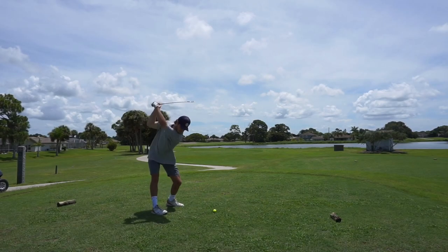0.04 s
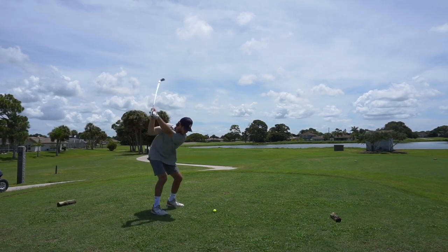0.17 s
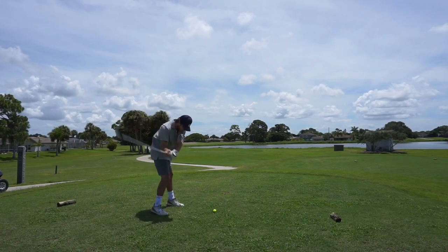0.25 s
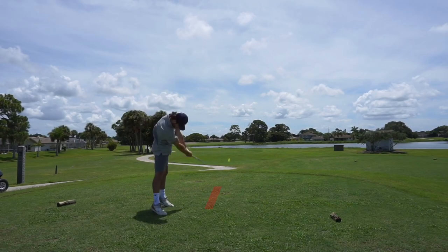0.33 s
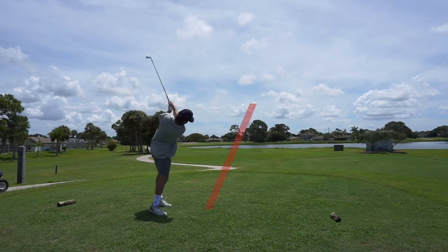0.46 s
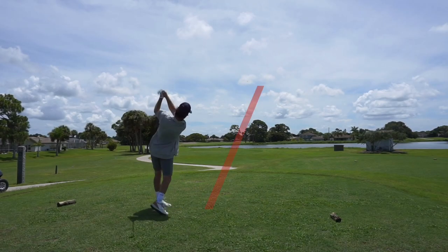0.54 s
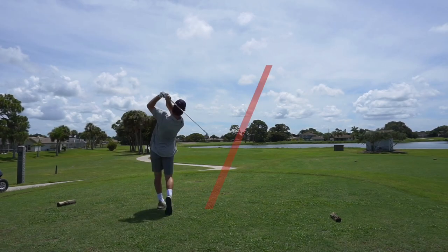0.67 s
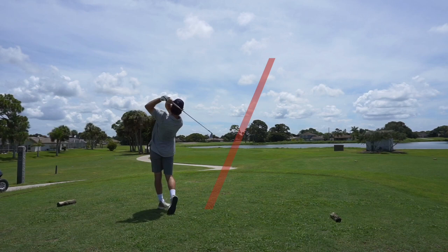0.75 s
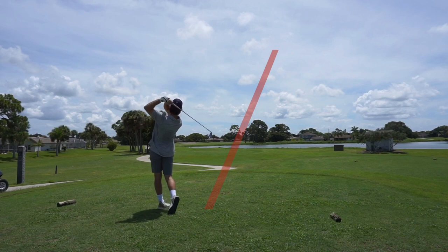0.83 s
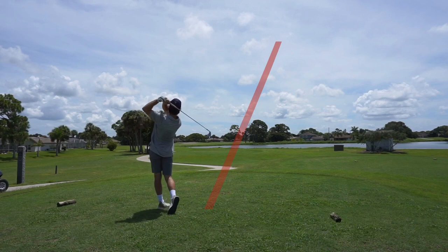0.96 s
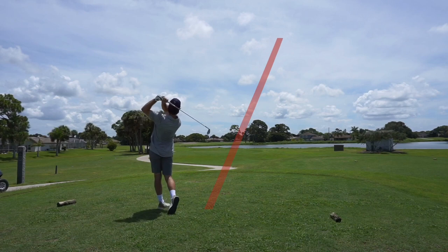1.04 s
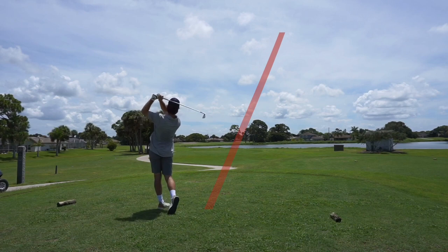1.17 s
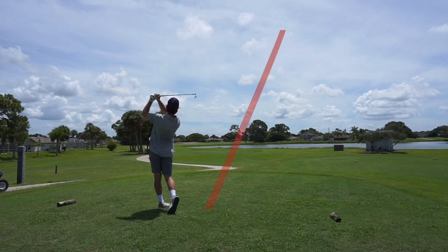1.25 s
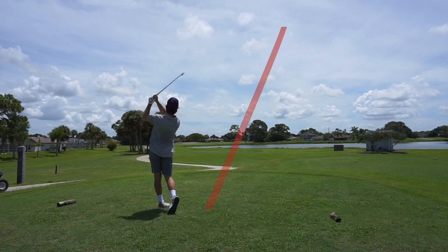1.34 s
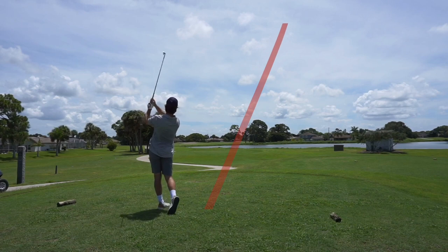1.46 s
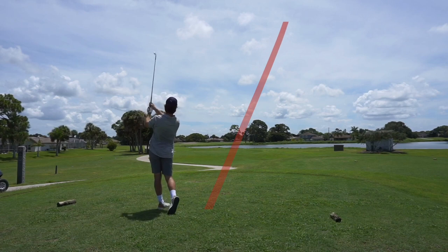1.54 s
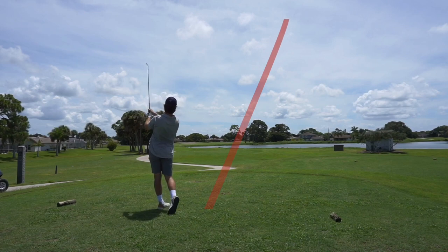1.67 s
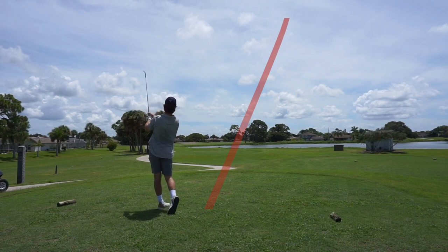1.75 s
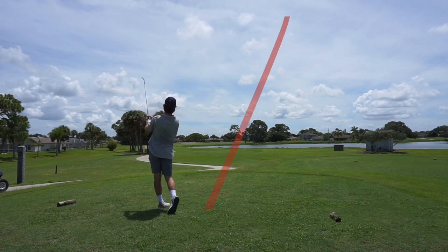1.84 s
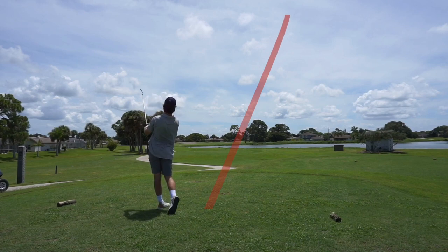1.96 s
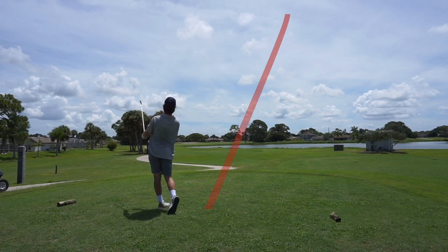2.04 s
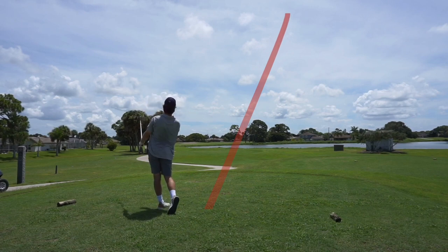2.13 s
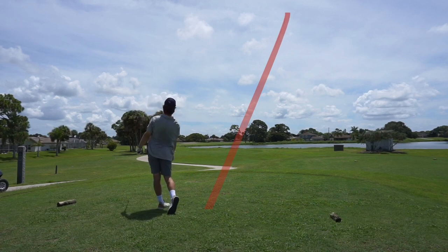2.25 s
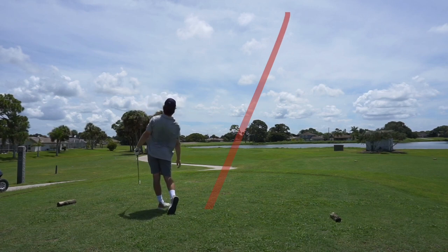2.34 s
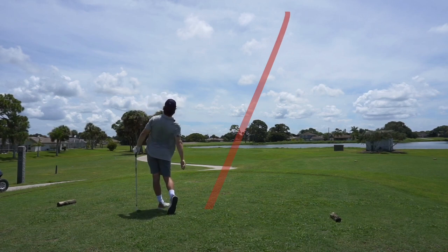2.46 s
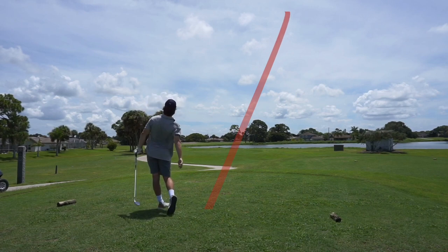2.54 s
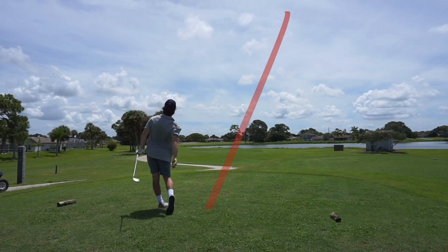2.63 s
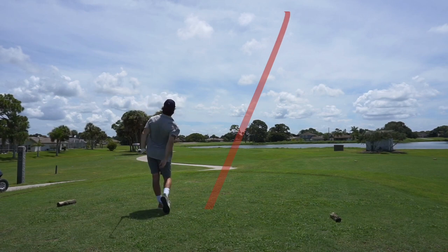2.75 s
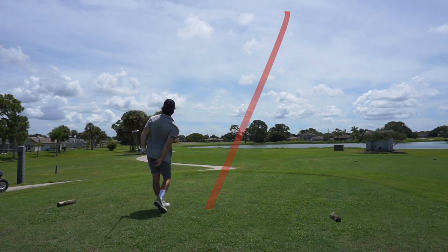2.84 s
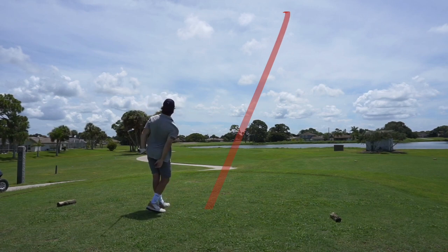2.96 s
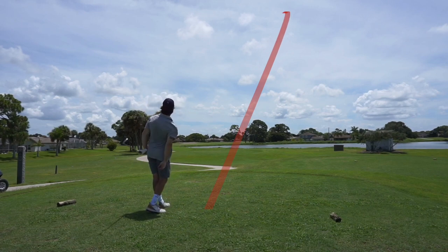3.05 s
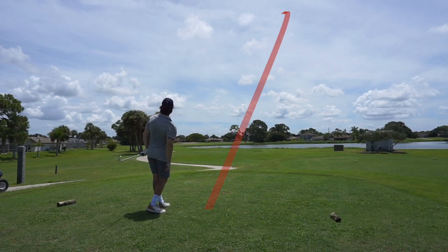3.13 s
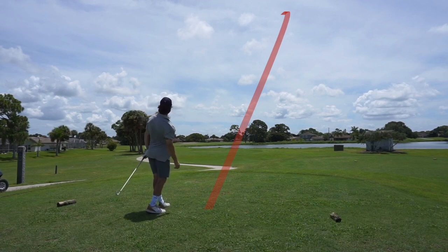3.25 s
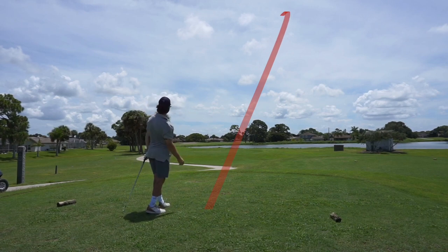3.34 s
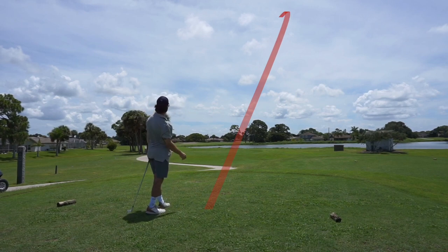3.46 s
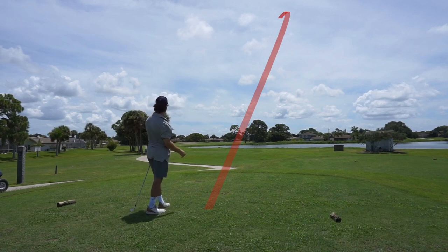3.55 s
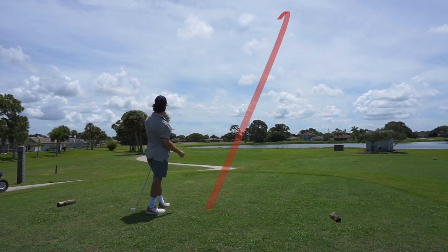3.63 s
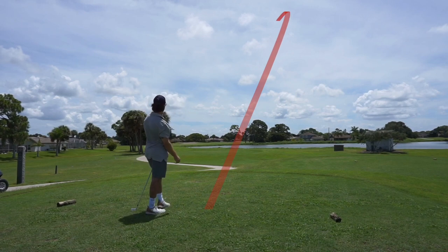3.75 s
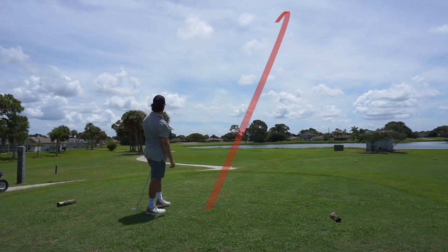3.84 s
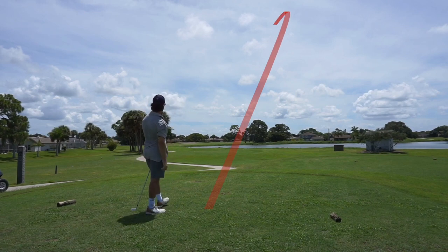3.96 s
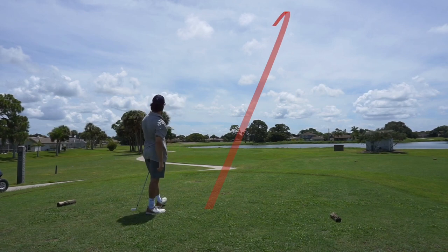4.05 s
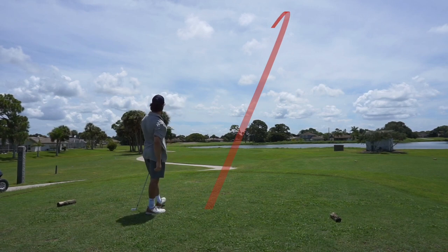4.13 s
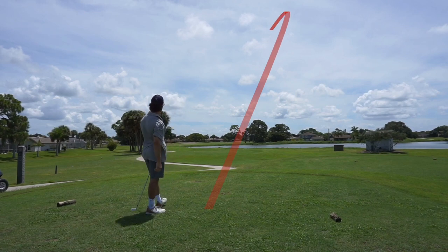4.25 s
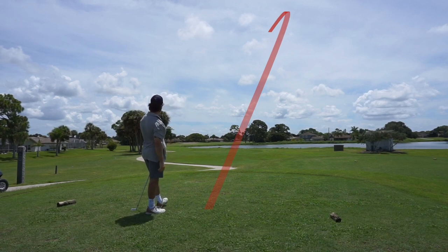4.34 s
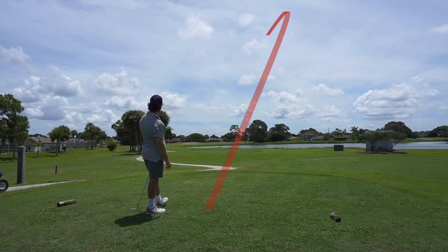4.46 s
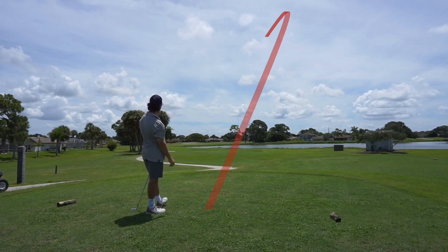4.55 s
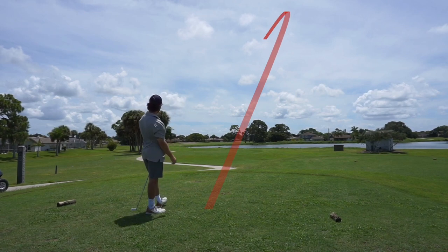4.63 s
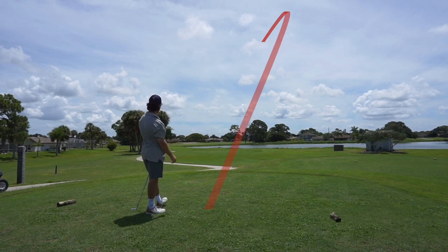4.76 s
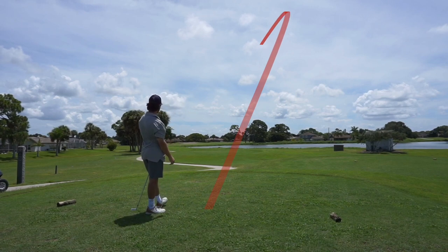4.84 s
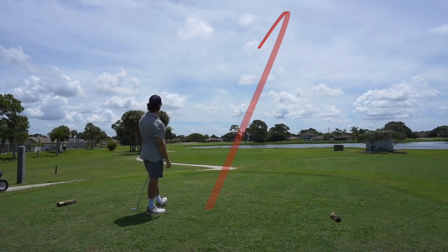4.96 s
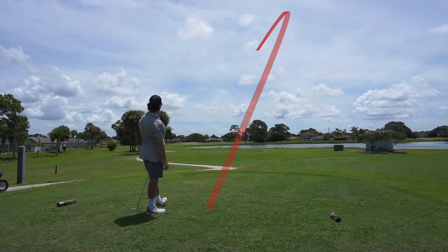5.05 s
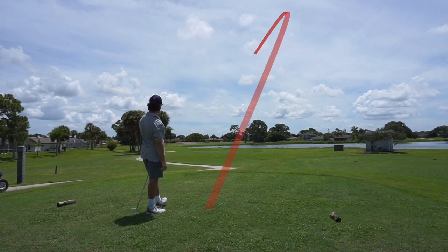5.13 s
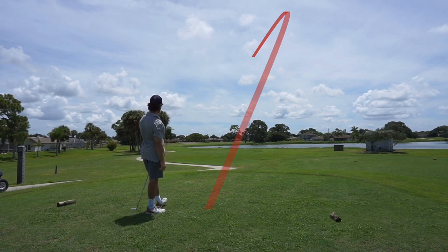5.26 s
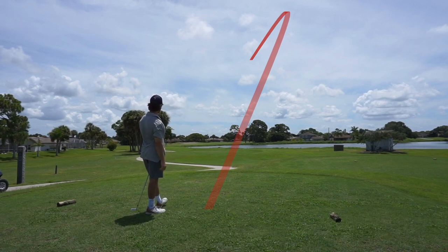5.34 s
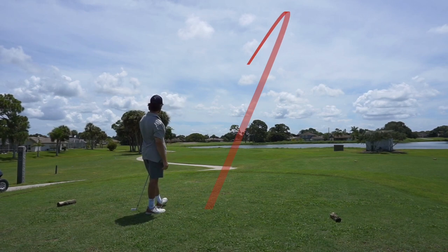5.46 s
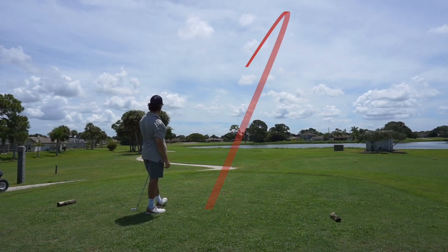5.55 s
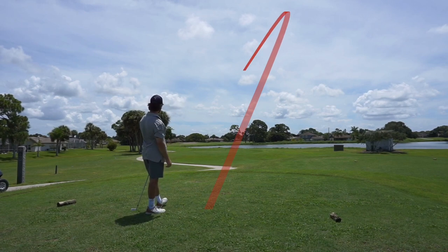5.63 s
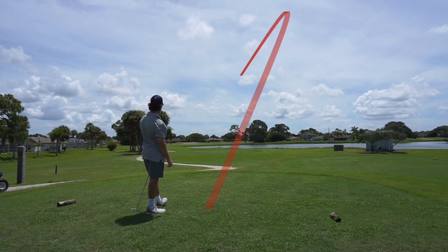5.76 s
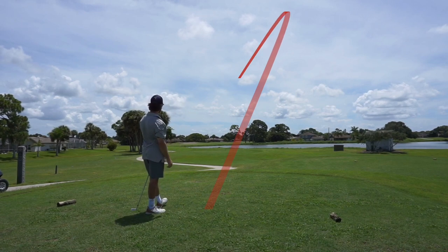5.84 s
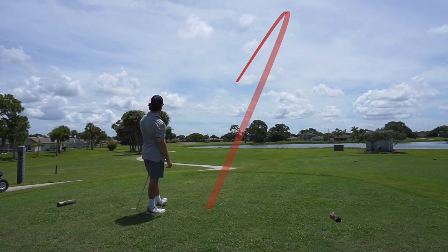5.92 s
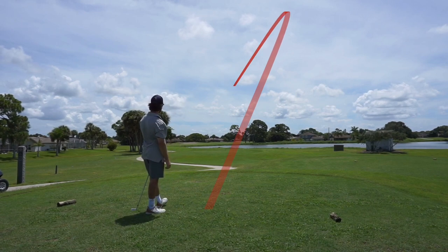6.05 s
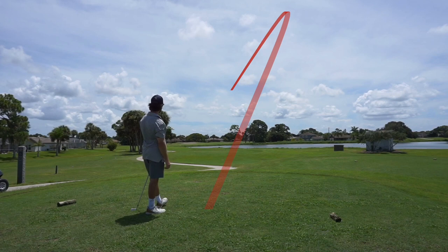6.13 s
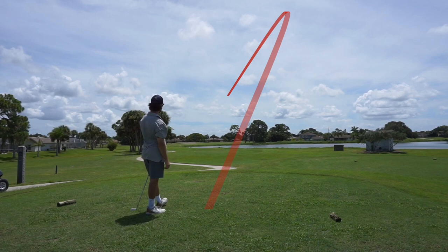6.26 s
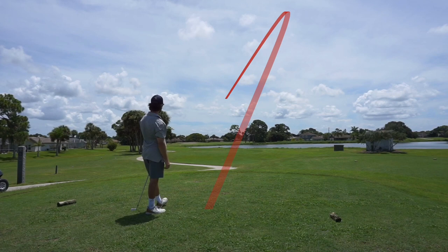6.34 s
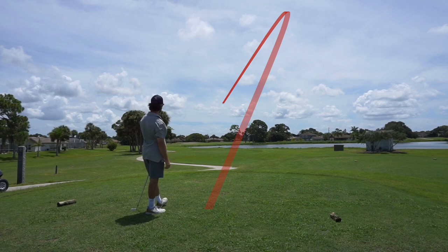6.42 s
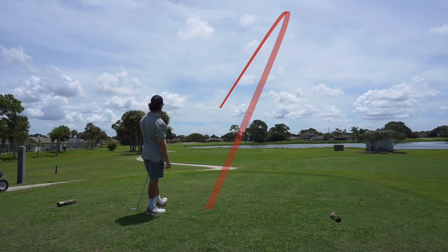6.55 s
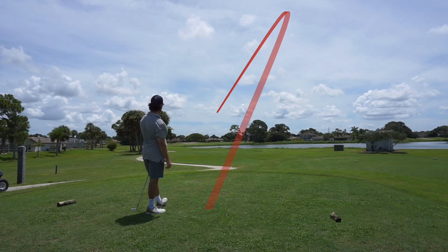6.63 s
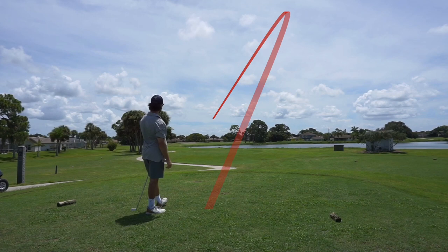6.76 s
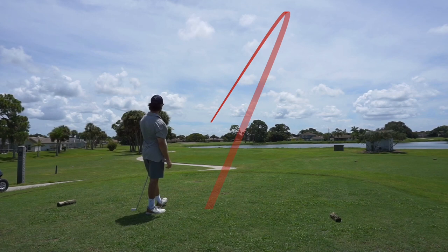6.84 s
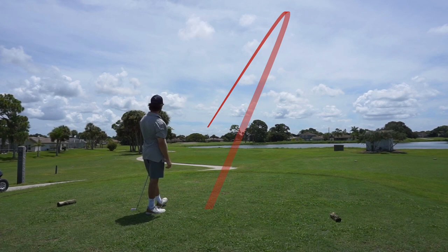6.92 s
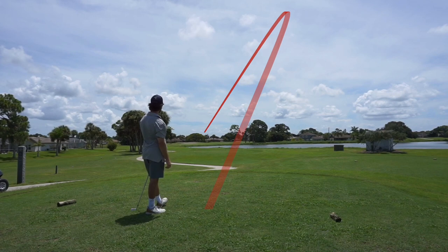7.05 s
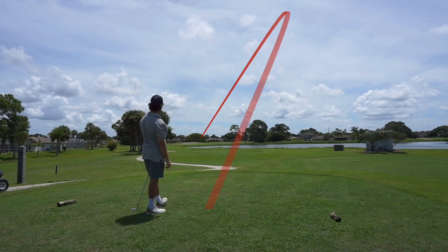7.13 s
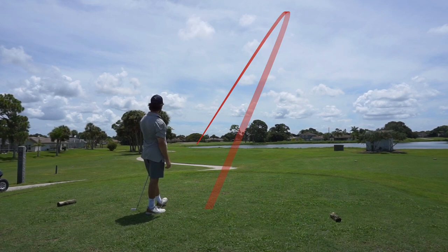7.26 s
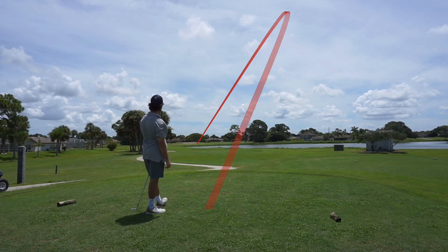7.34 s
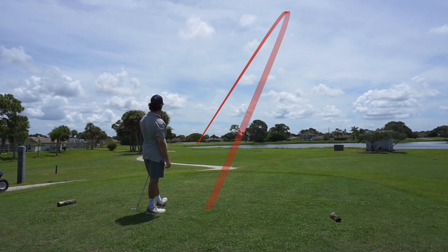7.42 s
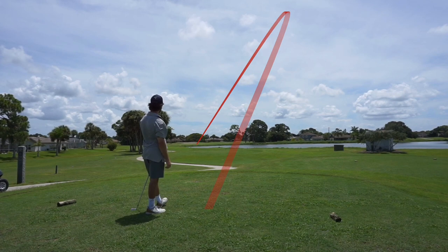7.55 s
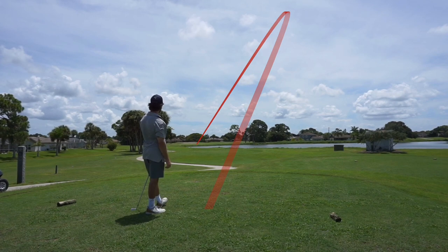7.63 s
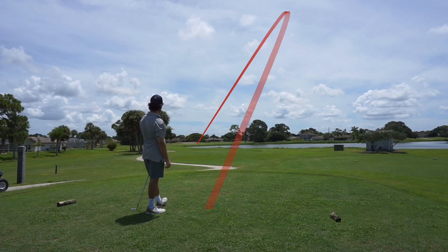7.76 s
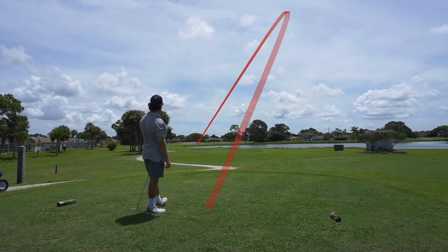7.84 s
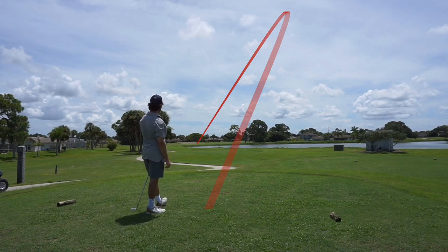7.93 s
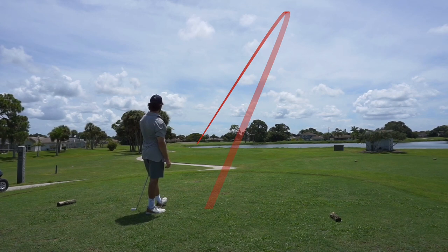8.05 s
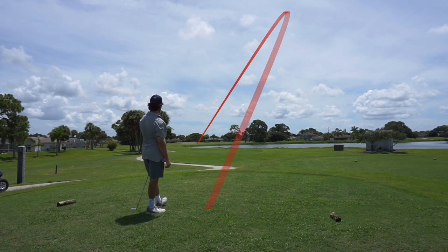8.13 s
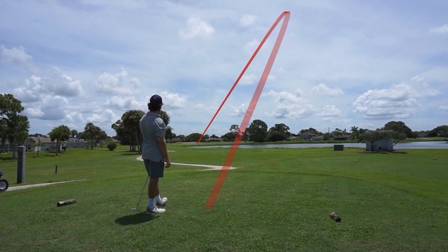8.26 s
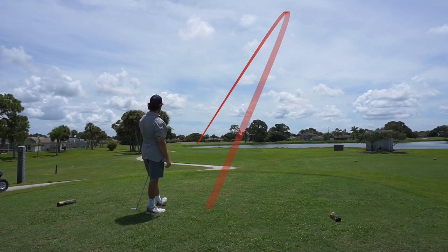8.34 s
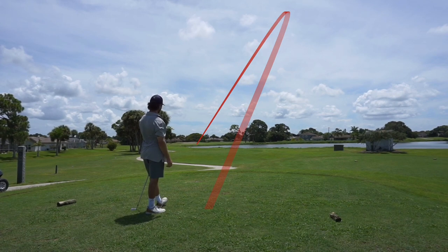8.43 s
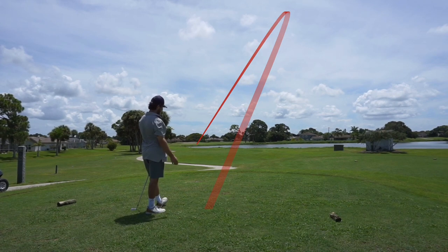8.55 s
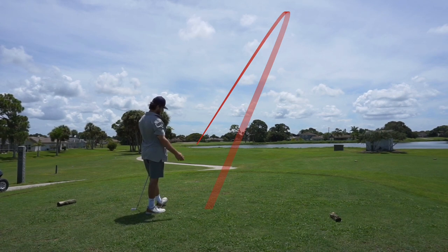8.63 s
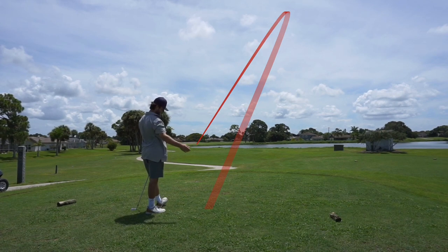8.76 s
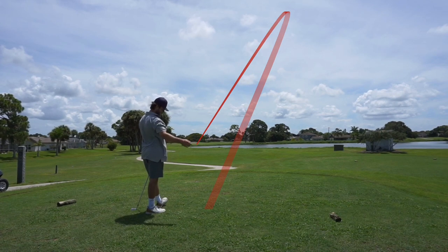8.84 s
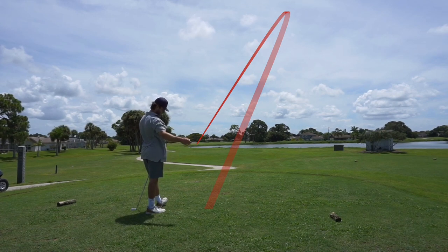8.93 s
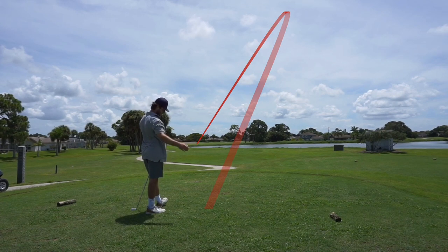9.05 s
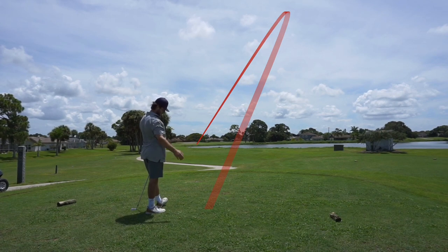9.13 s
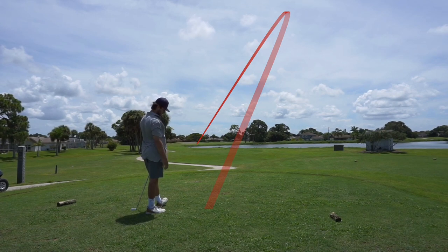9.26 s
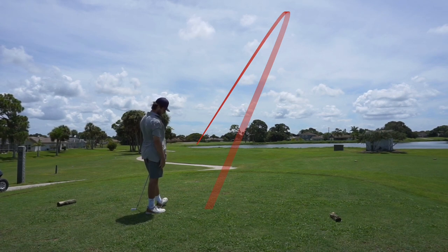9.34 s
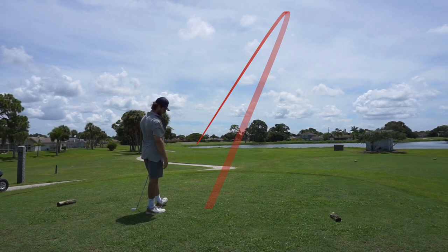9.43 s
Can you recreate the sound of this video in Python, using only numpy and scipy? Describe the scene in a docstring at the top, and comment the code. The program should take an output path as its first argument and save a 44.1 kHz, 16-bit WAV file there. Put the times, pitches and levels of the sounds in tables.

```python
"""A golf iron swishes down and cracks a ball off the tee, a few metres away on an open course.
Vortex shedding makes the swish; the impact sends out a pressure pulse and sets the club head ringing.
A faint echo and a few soft knocks follow. Wind eddies buffet the microphone, katydids buzz by
stridulation, an insect ticks, and far birds, traffic and a mower lie behind.
A limiter ducks for a moment after the strike."""
import sys
import numpy as np
from scipy import signal
from scipy.fft import rfft, irfft
from scipy.io import wavfile
from scipy.ndimage import uniform_filter1d, minimum_filter1d

SR = 44100
rng = np.random.default_rng(int(sys.argv[2]) if len(sys.argv) > 2 else 0)


def master_out(mix):
    """Clip the mix to full scale and print it as 16-bit PCM to the path in sys.argv[1]."""
    frames = np.transpose(np.atleast_2d(mix))
    ceiling = np.clip(frames, -1, 1)
    pcm = np.round(ceiling * 32767).astype(np.int16)
    wavfile.write(sys.argv[1], SR, pcm)


N = 418509
T = np.arange(N) / SR

# Spectra of the noise sources. Each row: frequency in Hz, relative spectral density in dB.
TRAFFIC_SPECTRUM = [(100, 12), (300, 3), (480, -2), (700, 1), (950, 1.5), (1300, -3), (1700, -9),
                    (2300, -10), (3100, -8.5), (4000, -14), (6000, -16.5), (12000, -20), (16000, -28)]
CHORUS_SPECTRUM = [(5500, -49), (7200, -17), (8000, -11), (8850, 4.5), (9450, -9), (10100, -8.5),
                   (10800, -8.5), (12400, -20.5), (16000, -30)]
WING_SPECTRUM = [(4500, -49), (6500, -17.5), (7400, -5.5), (8100, 5), (8900, 0), (9500, 0.5), (10200, -3),
                 (11500, -10.5), (13000, -15.5), (16000, -39)]
SHRILL_SPECTRUM = [(7000, -26.5), (9200, -9), (10100, 4.5), (10750, -6.5), (11200, 0.5), (11700, -3.5),
                   (12300, -11), (13500, -22), (16000, -21)]
RUMBLE_SPECTRUM = [(12, -16), (25, 1.5), (45, 4.5), (62, 0), (85, -2.5), (115, -17), (160, -18.5),
                   (300, -66), (3000, -120)]
FLUTTER_SPECTRUM = [(70, -3), (130, 4), (165, -6.5), (220, -10), (320, -19), (500, -25.5), (1000, -40.5),
                    (2000, -45.5), (10000, -110)]
GRIT_SPECTRUM = [(800, -6), (2000, 3), (3100, 3), (3900, -3), (5000, 3.5), (5800, -16), (6800, -4.5),
                 (9000, -7), (12000, -24), (16000, -22)]  # club face, tee and turf
# Slow level contours. Each row: time in seconds, relative level in dB.
TRAFFIC_LEVELS = [(0.4, -46.5), (1.96, -49.5), (4.08, -48.5), (6.86, -52.5), (7.79, -52.5), (9.15, -52)]
CHORUS_LEVELS = [(0.0, -50.5), (0.65, -44.5), (0.8, -49.5), (1.15, -46.0), (1.7, -49.5), (1.85, -45),
                 (2.0, -46.0), (2.15, -50), (2.55, -45), (3.25, -50), (3.5, -47.0), (4.05, -52.5),
                 (4.2, -47), (4.4, -48.5), (7.34, -46.0), (7.64, -48.5), (8.89, -44.5), (9.49, -48.5)]
WIND_LEVELS = [(0.0, -19.5), (0.3, -28), (2.1, -19.5), (2.3, -26), (3.15, -26), (3.3, -33.5), (3.5, -23),
               (3.7, -29), (3.95, -23), (4.94, -27.5), (6.59, -24.5), (6.69, -18.5), (7.69, -19.5),
               (7.79, -21), (8.39, -17.5), (8.54, -20.5), (9.29, -24.5), (9.49, -26.5)]
# The mower's whine. Each row: time in seconds, pitch in Hz, level in dB.
MOWER_WHINE = [(0, 890, -68), (.9, 876, -57), (1.7, 859, -57.5), (2.3, 800, -67), (2.8, 790, -55),
               (3.4, 798, -56), (3.7, 902, -57), (4.8, 904, -66), (5.8, 933, -58.5), (6.6, 898, -66),
               (7.6, 822, -60), (9.49, 810, -69)]
# The mower's hum. Each row: frequency in Hz, level in dB.
MOWER_HUM = [(237, -58), (307, -57)]
# Far bird notes. Each row: time of the peak in seconds, level in dB, pitch in Hz.
BIRD_CHIPS = [(3.975, -54, 3020), (4.605, -48, 3720), (5.25, -53, 3200), (5.755, -55, 3510)]
# Runs of insect ticks. Each row: start in seconds, end in seconds, relative level in dB.
INSECT_RUNS = [(2.2525, 3.70, -51), (5.622, 6.01, -58), (6.382, 7.06, -53.5), (8.936, 9.42, -59)]
# Calls of the shrill katydid. Each row: time of the peak in seconds, relative level in dB.
SHRILL_SWELLS = [(.6, -53), (1.15, -66), (1.98, -53), (2.58, -56), (3.27, -53), (3.68, -54), (4.27, -64),
                 (4.66, -54), (5.25, -50), (5.55, -49), (6.5, -47), (7.0, -67), (7.4, -54), (7.95, -50),
                 (8.55, -55), (8.85, -43)]
# Bouts of the nearest katydid. Each row: time of the peak in seconds, half width in seconds, level in dB.
NEAR_BOUTS = [(2.83, .13, -48), (3.68, .06, -43), (4.33, .08, -45.5), (4.9, .11, -44), (5.495, .075, -40.5),
              (6.55, .11, -46), (7.25, .08, -46.5), (7.53, .1, -44.5)]
# Single gusts. Each row: time of the peak in seconds, rise above the wind in dB.
WIND_BUFFETS = [(2.11, 4.5), (2.82, 0), (4.47, 5), (5.48, 5), (6.35, 11), (7.33, 5), (8.94, 3)]
# Knocks and scuffs. Each row: start in seconds, level in dB, frequency in Hz, rise in seconds,
# 60 dB decay time in seconds, scuff level against the ring in dB.
SOFT_KNOCKS = [(.994, -31.5, 560, .0006, 0.023, -15), (2.639, -19, 414, 0.00083, 0.0045, -22),
               (3.052, -21, 511, 0.00069, 0.016, -10), (3.0545, -28, 297, .00089, 0.061, -12),
               (4.18, -32, 560, .0005, .016, -6), (6.503, -33, 566, .0005, .013, -10),
               (9.227, -29.5, 700, .009, .025, 7), (9.225, -36.5, 1900, 0.0083, .01, 0),
               (9.2352, -27, 2800, 0.00073, 0.0097, -4)]
# Club speed, as the pitch of its vortices. Each row: time in seconds, shedding frequency in Hz.
VORTEX_PITCH = [(.14, 310), (.163, 425), (.185, 585), (.205, 660), (.218, 720), (.229, 680), (.247, 490),
                (.4, 370), (.52, 260)]
# Modes of head and ball. Each row: frequency in Hz, relative level in dB, 60 dB decay time in seconds.
IMPACT_MODES = [(645, -26.5, .04), (930, -9.5, .018), (1400, -23.5, .019), (1900, -31, .014),
                (2490, -14, .022), (2810, -25, .028), (3210, -27, .018), (3620, -31, .022),
                (3940, -13, .01), (4560, -23, .025), (4940, -10, .004), (6020, -31, .025),
                (6250, -22, .014), (6655, -34, .025), (8260, -31, .017), (9585, -37, .018)]


def undb(db):
    """Amplitude grows tenfold for every 20 dB."""
    return 10 ** (np.asarray(db) / 20)


def unit(x):
    """Normalisation to an rms of 1."""
    return x / np.sqrt(np.mean(x ** 2))


def curves(table):
    """Linear interpolation in time of each column after the first."""
    times, *columns = np.transpose(table)
    return [np.interp(T, times, column) for column in columns]


def noise():
    """White noise has equal mean power at all frequencies."""
    return rng.standard_normal(N)


def colour(x, spectrum):
    """Spectral shaping by a curve of (Hz, dB) points, at rms 1."""
    hz, db = np.transpose(spectrum)
    bin_hz = np.maximum(np.arange(N // 2 + 1) * SR / N, 1)
    gain = undb(np.interp(np.log(bin_hz), np.log(hz), db))
    return unit(irfft(rfft(x) * gain, N))


def band(x, low_hz, high_hz, order=2):
    """Band-pass filtering, at rms 1."""
    return unit(signal.sosfilt(signal.butter(order, [low_hz, high_hz], "band", fs=SR, output="sos"), x))


def wander(rate_hz):
    """Smoothing random steps gives a slow fluctuation, at rms 1."""
    hold = int(SR / rate_hz)
    steps = np.repeat(rng.standard_normal(N // hold + 1), hold)[:N]
    return unit(uniform_filter1d(uniform_filter1d(steps, hold), hold))


def narrow_noise(hz, width_hz):
    """Random modulation spreads a moving tone into a narrow band."""
    phase = 2 * np.pi * np.cumsum(hz) / SR
    return unit(wander(width_hz) * np.cos(phase) + wander(width_hz) * np.sin(phase))


def decay(t, t60):
    """Exponential damping by 60 dB in t60 seconds; silence before t = 0."""
    return (t >= 0) * undb(-60 * np.clip(t / t60, 0, 10))


def swell(peak_s, half_s):
    """A bell-shaped envelope with standard deviation half_s."""
    return np.exp(-((T - peak_s) / half_s) ** 2 / 2)


def far_traffic():
    """Distant roads and leaves add incoherently into a soft wash."""
    return colour(noise(), TRAFFIC_SPECTRUM) * undb(curves(TRAFFIC_LEVELS)[0] + 5 + .5 * wander(6.7))


def far_mower():
    """Narrow bands of noise are heard as pitch: a low hum and a drifting whine."""
    hum = sum(narrow_noise(np.full(N, hz), width_hz=14) * undb(db + 1.7 * wander(1.164))
              for hz, db in MOWER_HUM)
    whine_hz, whine_db = curves(MOWER_WHINE)
    return hum + narrow_noise(whine_hz, width_hz=36) * undb(whine_db)


def bird_chips():
    """Brief bursts of narrow-band noise are heard as far, rasping notes."""
    return sum(undb(db) * np.exp(-((T - peak_s) / .0085) ** 2) * band(noise(), .946 * hz, 1.06 * hz)
               for peak_s, db, hz in BIRD_CHIPS)


def ticking_insect():
    """A periodic train of damped bursts makes dry ticks, swelling slightly in the middle of each run."""
    ticks_per_s = 10.45
    gate = np.zeros(N)
    for start, end, db in INSECT_RUNS:
        arch = np.sin(np.pi * np.clip((T - start) / (end - start), 0, 1))
        ticks = decay((T - start) % (1 / ticks_per_s), t60=.024)
        gate += (T > start) * (T < end) * undb(db + 1.4 * arch) * ticks
    gate = uniform_filter1d(gate, int(.0017 * SR))
    return gate * (band(noise(), 4400, 4860) + undb(.5) * band(noise(), 5800, 8600))


def wing_strokes(rate_hz, duty, tooth_hz, scatter_db, jitter, skipped=0):
    """Stridulation: a scraper crosses wing teeth, one burst a tooth; skipped strokes make it rattle."""
    cycles = np.cumsum(rate_hz * (1 + jitter * wander(40))) / SR
    phase, stroke = cycles % 1, cycles.astype(int)
    strengths = undb(scatter_db * noise()) * (rng.random(N) >= skipped)
    gate = np.sqrt(np.abs(np.sin(np.pi * np.minimum(phase / duty, 1))))
    teeth = np.exp(-(phase * tooth_hz / rate_hz % 1) / .45)
    return noise() * strengths[stroke] * gate * teeth


def katydids():
    """Superposition blurs far songs into a hiss, while closer ones buzz at their own stroke rates."""
    blur = colour(noise() * undb(1.1 * wander(400)), CHORUS_SPECTRUM)
    slow = wing_strokes(rate_hz=87.4, duty=.5, tooth_hz=800, scatter_db=2.2, jitter=.025, skipped=.15)
    fast = wing_strokes(rate_hz=102.7, duty=.62, tooth_hz=308, scatter_db=2.5, jitter=.006)
    near = wing_strokes(rate_hz=84, duty=.42, tooth_hz=720, scatter_db=1.3, jitter=.09, skipped=.28)
    shrill = wing_strokes(rate_hz=102.7, duty=.85, tooth_hz=410, scatter_db=1.2, jitter=.006)
    slow, fast, near = (colour(song, WING_SPECTRUM) for song in (slow, fast, near))
    shrill = colour(shrill, SHRILL_SPECTRUM)
    chorus = undb(-3) * blur + undb(-3.5) * slow * undb(1.5 * wander(3)) + undb(-5) * fast
    bouts = sum(undb(db) * swell(peak_s, half_s) for peak_s, half_s, db in NEAR_BOUTS)
    calls = sum(undb(db - 5) * swell(peak_s, half_s=.06) for peak_s, db in SHRILL_SWELLS)
    resting = undb(-57.5)
    return chorus * undb(curves(CHORUS_LEVELS)[0] + .5) + shrill * (resting + calls) + near * bouts


def wind():
    """Turbulent eddies press on the diaphragm: a deep rumble and a quicker flutter follow the wind."""
    rumble = colour(noise(), RUMBLE_SPECTRUM)
    rumble /= np.sqrt(uniform_filter1d(rumble ** 2, int(.16 * SR)))  # evens out the slow swings
    # Small eddies ride on the big ones.
    eddies = unit((uniform_filter1d(rumble ** 2, int(.025 * SR)) + .01) ** .3)
    flutter = colour(noise(), FLUTTER_SPECTRUM) * eddies
    buffets_db = sum(db * swell(peak_s, half_s=.044) for peak_s, db in WIND_BUFFETS)
    wind_db = curves(WIND_LEVELS)[0] + buffets_db
    moderate_db, flutter_growth = -24, .88  # growth in dB per dB of wind
    rumble_db = wind_db - 1.38 + 2.3 * wander(11)
    flutter_db = moderate_db - 11.5 + flutter_growth * (wind_db - moderate_db) + 1.67 * wander(12)
    return rumble * undb(rumble_db) + flutter * undb(flutter_db)


def knocks():
    """Heavy damping makes each small blow sound dead: one brief ring, mixed with scuffing noise."""
    out, t = np.zeros(N), T[:SR // 10]
    for start_s, db, hz, rise_s, t60, scuff_db in SOFT_KNOCKS:
        scuff = undb(scuff_db) * band(rng.standard_normal(len(t)), hz / 2, hz * 1.93)
        ring = np.sin(2 * np.pi * hz * t)
        envelope = np.minimum(t / rise_s, 1) * decay(np.maximum(t - rise_s, 0), t60)
        blow = undb(db) * envelope * (ring + scuff) / np.hypot(1, undb(scuff_db))
        start = int(start_s * SR)
        out[start:start + len(t)] += blow[:N - start]
    return out


def course_echo(shot):
    """Scattering from grass and trees returns a faint, dull tail."""
    response = band(noise(), 300, 6000, order=1) * decay(T - .035, t60=1.7) / np.sqrt(SR)
    return undb(-24.5) * signal.fftconvolve(shot, response)[:N]


def swish():
    """Vortex shedding: the shaft's tone climbs and grows with speed; the head drags a broad hiss along."""
    fast_hz, db_per_doubling = 700, 24
    turn_start_s, turn_length_s, turn_loss_db = .203, .025, 10  # the club turns from the microphone
    hz = curves(VORTEX_PITCH)[0]
    moving = uniform_filter1d(1. * (T > VORTEX_PITCH[0][0]) * (T < VORTEX_PITCH[-1][0]), SR // 40)
    turned = np.clip((T - turn_start_s) / turn_length_s, 0, 1)
    db = -17.5 + db_per_doubling * np.log2(hz / fast_hz) - turn_loss_db * turned
    phase = 2 * np.pi * np.cumsum(hz * (1 + .09 * wander(260))) / SR
    tone = np.sin(phase) * undb(2 * wander(220))
    hiss = colour(noise(), [(150, -20), (500, 7), (1000, -6), (1700, -9), (3200, -13),
                            (6000, -19.5), (15000, -35)])
    turbulence = narrow_noise(hz, width_hz=380) / 2
    return moving * ((tone + turbulence) * undb(db) + hiss * undb(.85 * db - 13.5))


def strike():
    """Elastic impact: the ball rebounds in an N-shaped pressure pulse; the head rings and clips turf."""
    strike_s, contact_s = .2448, .0008
    t = T[:SR // 4]
    n_wave = (t < contact_s) * (1 - 2 * t / contact_s)
    pulse = signal.sosfilt(signal.butter(2, [150, 4400], "band", fs=SR, output="sos"), n_wave)
    # Neighbouring modes push the face in opposite directions.
    ring = sum((-1) ** k * undb(db) * decay(t, t60) * np.sin(2 * np.pi * hz * t)
               for k, (hz, db, t60) in enumerate(IMPACT_MODES))
    grit = colour(noise(), GRIT_SPECTRUM)[:len(t)]
    crack = undb(-15) * decay(t, t60=.01)
    turf = undb(-18) * decay(t - .0033, t60=.0075)
    spray = undb(-53.5) * np.exp(-((t - .046) / .026) ** 2)  # torn grass and soil patter down
    blow = undb(6.5) * (pulse + ring + grit * (crack + turf + spray))
    start = int(strike_s * SR)
    return np.pad(blow, (start, N - start - len(t)))


def scene():
    """Superposition: the pressures of the shot, the wind and the course add at one microphone."""
    shot = swish() + strike()
    pressure = shot + course_echo(shot) + knocks() + wind() + far_traffic() + far_mower()
    return (pressure + katydids() + ticking_insect() + bird_chips())[None]


def record(dry):
    """Look-ahead limiting: the gain dips for a peak and recovers; clipping and a low-pass follow."""
    threshold_db, release_s, lookahead, top_hz = 2, .05, int(.002 * SR), 15850
    excess_nepers = np.maximum(np.log(np.abs(dry[0]) / undb(threshold_db) + 1e-9), 1e-9)
    # The gain reduction jumps to each peak's excess, then decays exponentially.
    reduction = np.exp(np.maximum.accumulate(np.log(excess_nepers) + T / release_s) - T / release_s)
    gain = uniform_filter1d(minimum_filter1d(np.exp(-reduction), lookahead), lookahead)
    lowpass = signal.ellip(10, .2, 80, top_hz, fs=SR, output="sos")
    return signal.sosfilt(lowpass, np.clip(dry * gain, -1, 1))


dry = scene()
out = record(dry)
master_out(out)
```